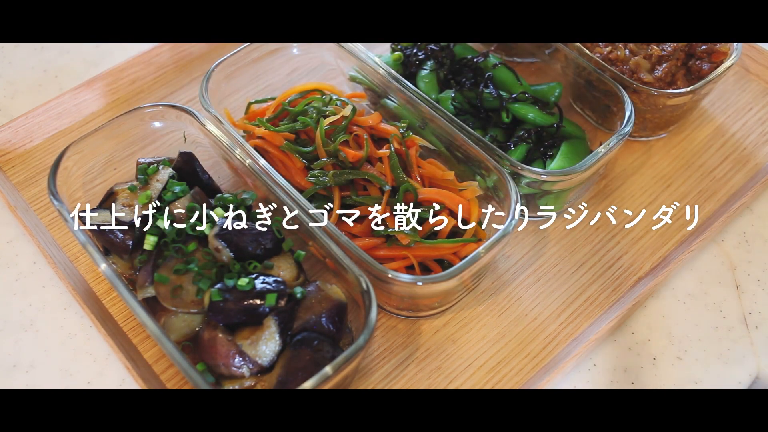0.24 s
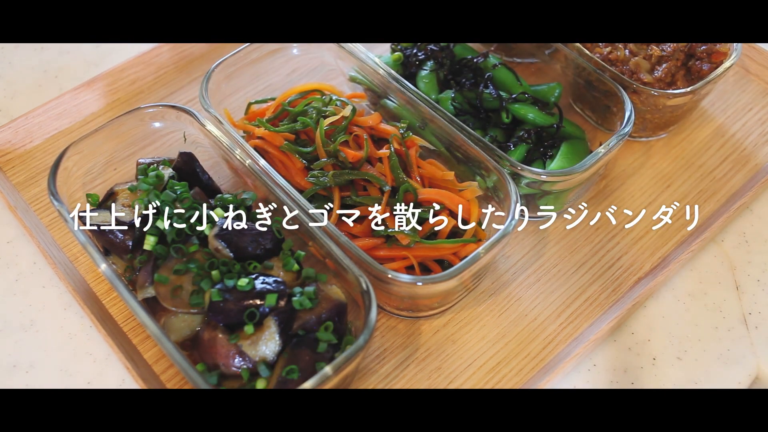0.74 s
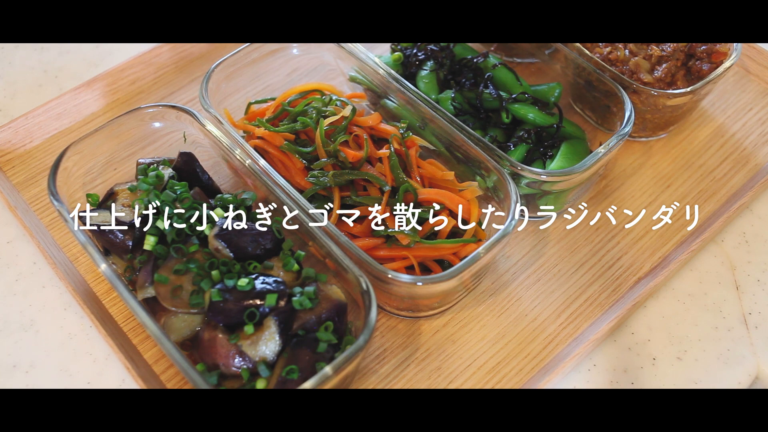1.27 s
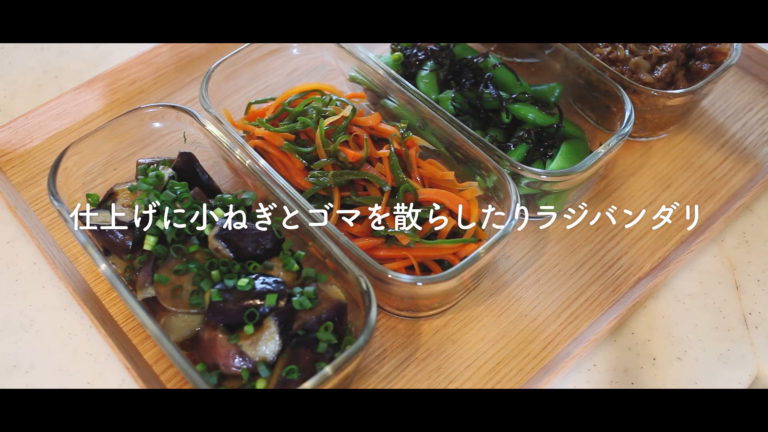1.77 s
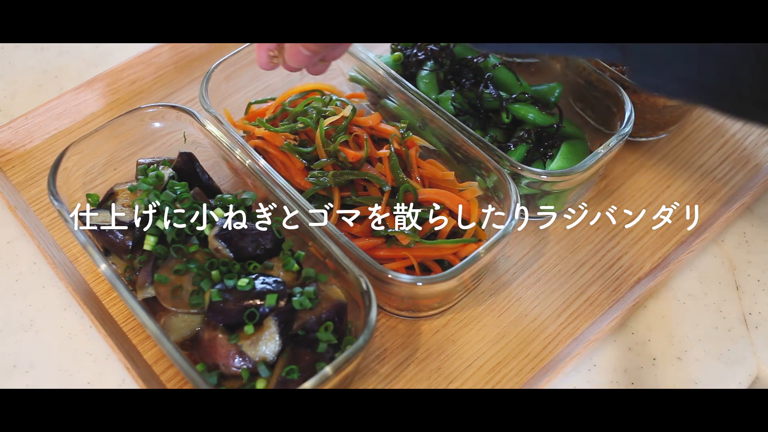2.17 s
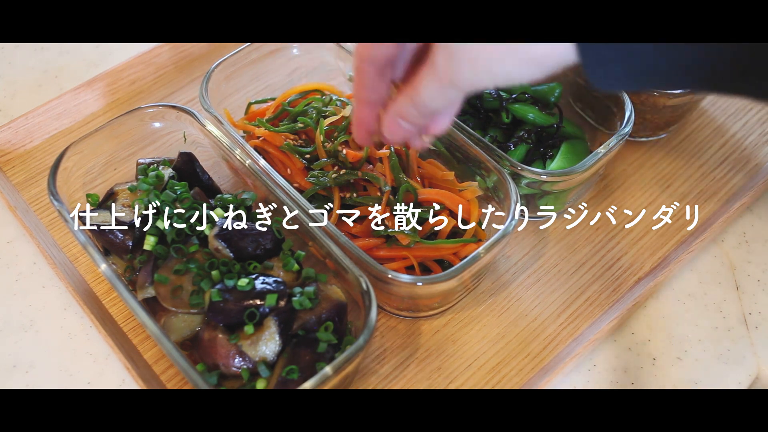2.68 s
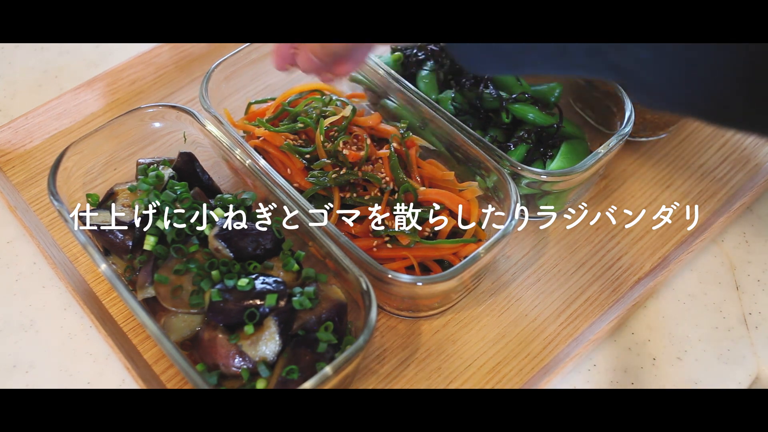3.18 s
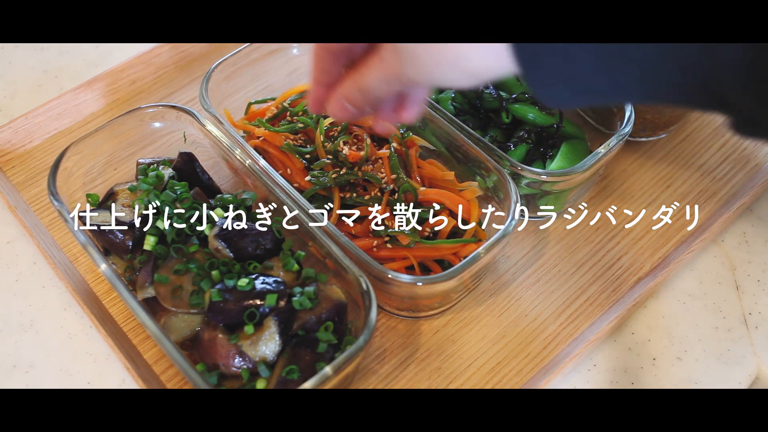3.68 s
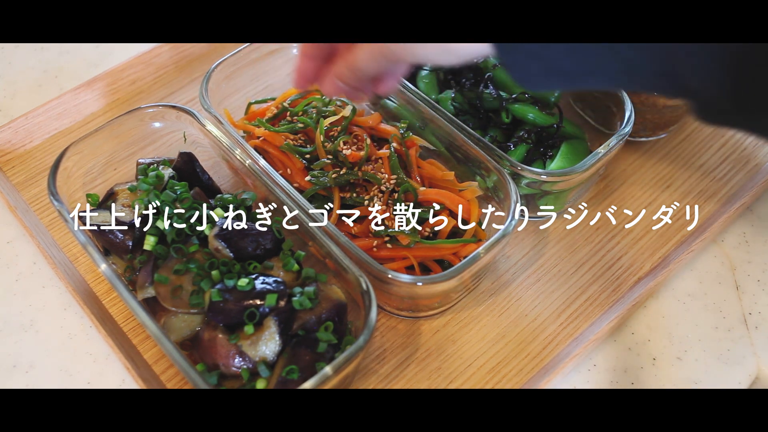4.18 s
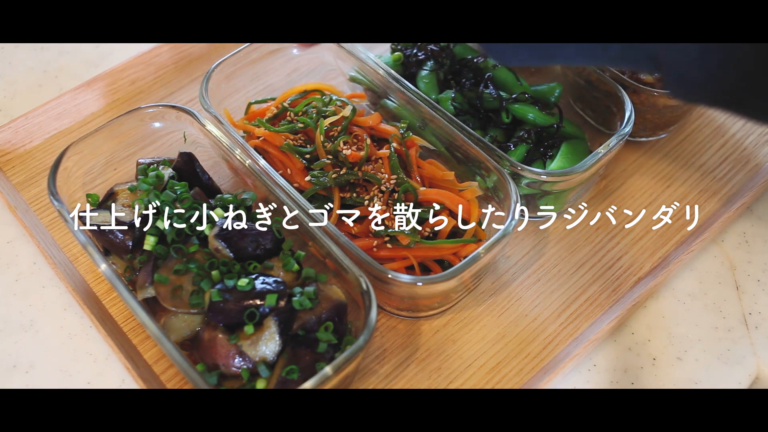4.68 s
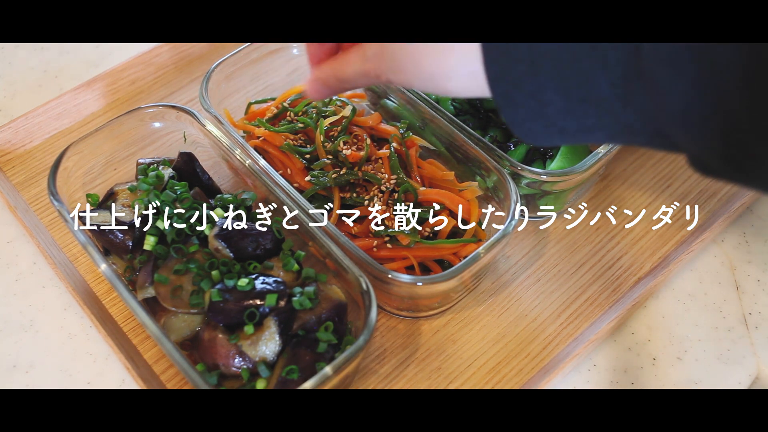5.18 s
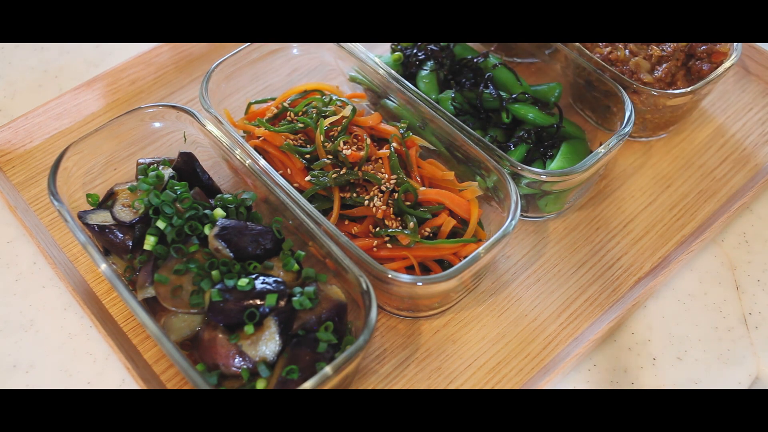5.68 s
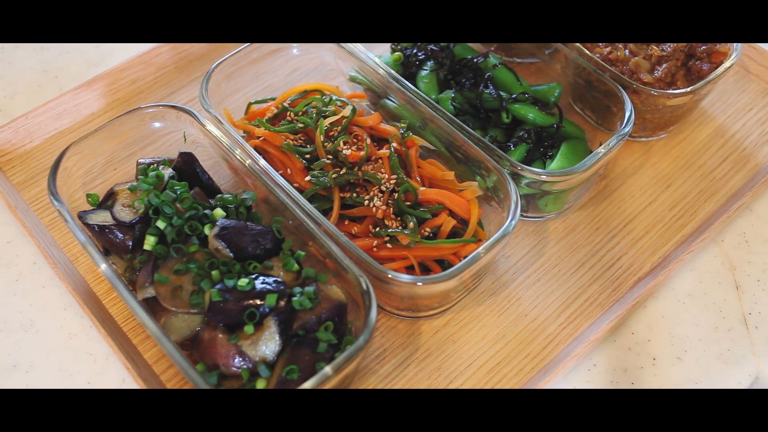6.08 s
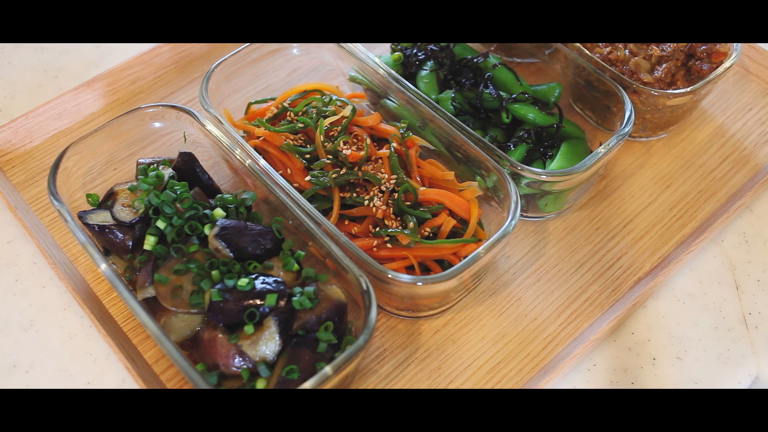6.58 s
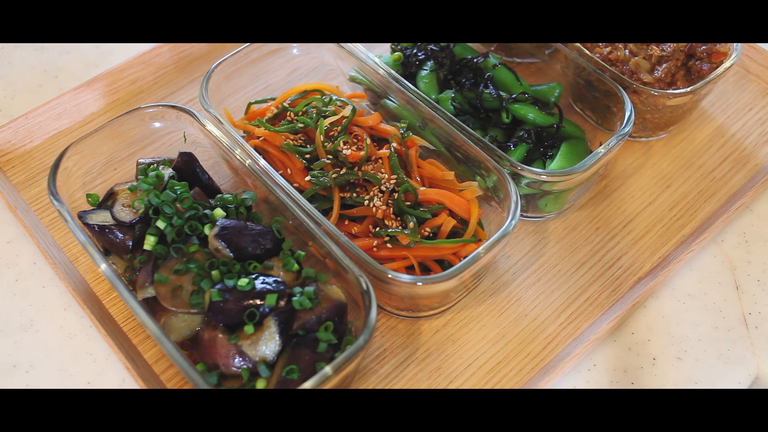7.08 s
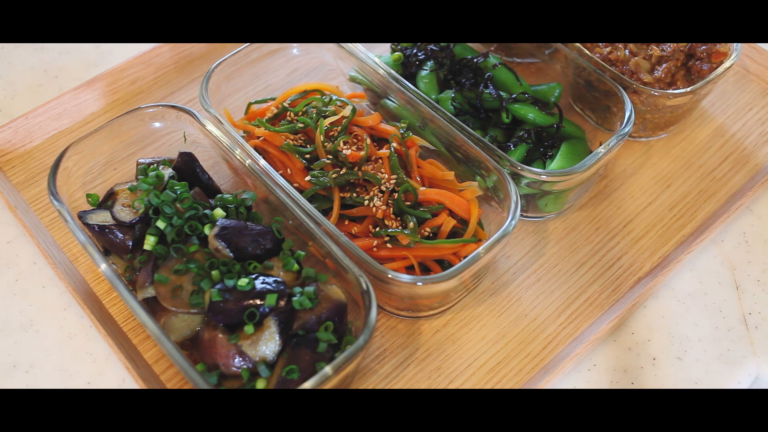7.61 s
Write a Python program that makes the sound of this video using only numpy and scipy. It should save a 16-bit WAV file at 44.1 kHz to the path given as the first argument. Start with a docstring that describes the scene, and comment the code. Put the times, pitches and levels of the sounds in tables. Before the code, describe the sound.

A quiet home kitchen, heard close up, with low soft ventilation and a short hard-walled tail. From 0.1 to 0.7 s a plastic pouch crinkles lightly, with a firmer click near 0.4 and a crisp pair at 0.8. Near-quiet follows until 1.6-1.7, when film slides and fingers bump a hollow tub; another bump and click at 2.0 brings a tiny rim squeak. From about 2.1 to 5.2 fingertips rub sesame in a very faint grainy hiss, with bright seed ticks on glass around 2.2-2.8, 3.7 and 4.9, and soft patter on food near 3.7. At 5.5-5.7 the tub is bumped again, then knocks and rocks on the wooden counter at 5.8. Loud, sharp crumpling bursts from 6.05 to 6.55, eases, and flares again at 6.9-7.2, leaving a faint dish-like ring. Small creases and a weak knock near 7.4 fade into room tone.

```python
"""A plastic pouch crinkles open and is later crumpled shut: filtered click grains make its buckles, creases and folds.
In between, fingers bump a hollow tub (damped modes), squeak on its rim and rub pinches of sesame (grainy hiss).
A few seeds ping on glass, others patter on food, and the tub knocks on a wooden counter (modes plus noise).
The hardest buckles leave a faint dish-like ring. Close kitchen walls add a short tail, over soft ventilation."""
import sys
import numpy as np
from scipy import signal
from scipy.fft import rfft, irfft
from scipy.io import wavfile

SR = 44100
rng = np.random.default_rng(int(sys.argv[2]) if len(sys.argv) > 2 else 0)


def materialize(psi):
    """Save the field psi as 16-bit PCM at rate SR to the path in sys.argv[1].

    A 1-D psi becomes a single channel; in a 2-D psi each row is a channel.
    """
    bounded = np.clip(np.atleast_2d(psi).T, -1, 1)
    quanta = np.round(bounded * 32767).astype(np.int16)
    wavfile.write(sys.argv[1], SR, quanta)


N = 346185
T = np.arange(N) / SR  # time axis of the scene, s
HIT_T = np.arange(8192) / SR  # time axis of one hit, s

# Buckles of the pouch; small facets tilt bright, large ones dull:
# [t/s, peak level before trim/dB, tilt/(dB per octave), decay time of the crunch/s]
BUCKLES = [(0.1388,-38.5,-2.5,0.032),(0.2258,-33,1.5,0.034),(0.29,-36,4,0.027),(0.344,-35.5,7,0.034),(0.42,-20,0.5,0.027),(0.4818,-40,15,0.035),(0.589,-33,8.5,.025),(0.6396,-31.5,-2.5,0.027),
           (0.7786,-31,-1,.022),(0.7883,-22.5,1.5,0.017),(0.7908,-19,2,0.015),(0.9998,-42,2,0.016),(1.595,-34,1.5,0.023),(1.63,-34,5,0.018),(2.0092,-25.5,-0.5,0.018),(5.592,-36,-6.5,0.027),(5.6078,-30,-4,0.076),
           (6.061,-16,-2,0.018),(6.1981,-13,-1.5,0.052),(6.2313,-14.5,-3,0.022),(6.2712,-7,0,0.026),(6.2947,-12,0,0.049),(6.326,-16.5,-1.5,0.03),(6.3985,-15.5,0,.04),(6.412,-16.5,5,0.01),(6.426,-11.5,3.5,0.023),(6.469,-18,-0.5,0.02),
           (6.878,-20,2,0.052),(6.910,-17.5,-4,0.024),(6.9143,-8.5,0.5,0.025),(6.925,-9.5,3,0.015),(6.929,-9,1,0.0059),(6.945,-19,0,.02),(6.9775,-16.5,1.5,0.079),
           (7.0037,-13,9,0.011),(7.0067,-9.5,9,0.017),(7.0211,-14,3.5,.025),(7.165,-21,2,0.034),(7.256,-37.5,-3.5,0.033),(7.3808,-24.5,-1,0.028)]
# Tone of the creasing film: [f/Hz, relative level/dB]
FILM_TONE = [(70,-45),(170,-26.5),(350,-6.5),(750,-3),(1400,-1.5),(3000,0.5),(6800,2.5),(9200,-7),(12000,-27),(15500,-49.5)]


def undb(db):
    """Decibels to gain."""
    return 10 ** (np.asarray(db) / 20)


def unit(x):
    """Scale to rms 1."""
    return x / np.sqrt(np.mean(x ** 2))


def strike(x):
    """Scale a hit to rms 1 over its first 3 ms."""
    return x / np.sqrt(np.mean(x[:132] ** 2))


def curve(rows):
    """Draw each column of a table of (time, ...) rows as a line, sample by sample."""
    s, *columns = np.transpose(rows)
    return [np.interp(T, s, column) for column in columns]


def swell(t, rise, fall):
    """Bell-shaped envelope with its crest at t = 0 and separate rise and fall times in s."""
    return np.exp(-(t / np.where(t < 0, rise, fall)) ** 2)


def add(out, s, x):
    """Mix x into out at time s."""
    i = int(s * SR)
    out[i:i + len(x)] += x[:len(out) - i]


def band(x, lo_hz, hi_hz, order=2):
    """Band-pass."""
    sos = signal.butter(order, [lo_hz, hi_hz], "band", fs=SR, output="sos")
    return signal.sosfilt(sos, x)


def colour(x, points, ripple_db=0, size=4096):
    """Minimum-phase filter through (Hz, dB) points, with chance resonances on top."""
    hz, db = np.transpose(points)
    f = np.maximum(np.arange(size // 2 + 1) * SR / size, 1)
    ripple_f = np.linspace(np.log(200), np.log(SR / 2), 40)
    ripple = np.interp(np.log(f), ripple_f, rng.standard_normal(40))
    response_db = np.interp(np.log(f), np.log(hz), db) + ripple_db * ripple
    # folding the cepstrum forward makes the filter causal
    cepstrum = irfft(np.log(undb(response_db)))
    cepstrum[1:size // 2] *= 2
    cepstrum[size // 2 + 1:] = 0
    impulse = irfft(np.exp(rfft(cepstrum)))
    return signal.fftconvolve(x, impulse)[:len(x)]


def grains(count, per_s, spread_db):
    """Clicks at random moments with random signs; spread_db scales how far their sizes scatter."""
    sizes = undb(spread_db * np.minimum(rng.exponential(size=count), 4))
    clicks = rng.random(count) < per_s / SR
    return unit(clicks * rng.choice([-1, 1], count) * sizes)


def crinkle(count, per_s, spread_db, points, ripple_db):
    """Creases spread over four facets of film, each with its own resonances."""
    facets = [colour(grains(count, per_s / 4, spread_db), points, ripple_db) for _ in range(4)]
    return unit(sum(facets))


def fade(t60):
    """Exponential decay of a hit, falling 60 dB in t60 seconds."""
    return np.exp(-np.log(1000) * HIT_T / t60)


def ring(modes, weight_db, scatter_db=1):
    """Damped modes; the place and hardness of the blow weight their shares."""
    hz, db, t60 = np.transpose(modes)
    gain = undb(db + weight_db(hz) + scatter_db * rng.standard_normal(len(hz)))
    gain = gain * rng.choice([-1, 1], len(hz))
    sines = np.sin(2 * np.pi * hz[:, None] * HIT_T)
    return strike(gain @ (fade(t60[:, None]) * sines))


def crack(lo_hz, hi_hz, t60):
    """The brief noise of a contact."""
    return strike(band(rng.standard_normal(len(HIT_T)) * fade(t60), lo_hz, hi_hz, order=3))


def kitchen(x, wet_db=0):
    """Dense reflections from counter and walls, drawn afresh for every sound; the bass decays slowest."""
    response = np.zeros(len(HIT_T))
    build_up = 1 - np.exp(-HIT_T / 0.00026)
    # low edge Hz, high edge Hz, t60 s, level dB
    for lo, hi, t60, db in [(100, 730, 0.26, -3.5), (750, 2420, 0.21, 1.0),
                            (3050, 9100, 0.22, -3), (6900, SR / 2 - 1, 0.2, -3.0)]:
        tail = rng.standard_normal(len(HIT_T)) * fade(t60) * build_up
        response += undb(db + wet_db) * band(tail / np.linalg.norm(tail), lo, hi)
    response[0] += 1  # the direct sound
    return signal.fftconvolve(x, response)


def room_tone():
    """Soft ventilation rumble and hiss: coloured noise whose level drifts."""
    # Tone of the ventilation: [f/Hz, relative level/dB]
    ventilation = [(15, -31.5), (30, 2.5), (55, -2), (183, -10), (233, -5), (281, -13.5), (368, -7.5),
                   (457, -14.5), (703, -10.5), (826, -17), (1710, -20), (3340, -19.5), (3830, -18.5),
                   (5730, -20.5), (15500, -36)]
    # Drift of the room tone: [t/s, level/dB]
    drift = [(0,-62.5),(.9,-70),(1.35,-69),(1.8,-64.5),(7,-65.5),(7.8,-71.5)]
    db, = curve(drift)
    return unit(colour(rng.standard_normal(N), ventilation)) * undb(db)


def rustle():
    """Worked film: thousands of tiny creases a second, a bass as the pouch flexes, a sharp edge when pressed hard."""
    # Spells of working the pouch, one to open it and two to close it; rows in each:
    # [t/s, level of the creases before trim/dB, level of the bass before trim/dB]
    spells = [
        [(0.12, -73, -85), (0.192, -46.5, -78), (0.316, -50.5, -69), (0.442, -50.5, -80), (0.686, -62, -82),
         (0.76, -82, -86)],
        [(5.98, -62, -72), (6.114, -45.5, -61), (6.242, -34.5, -51), (6.306, -76, -60), (6.368, -44, -40),
         (6.416, -32, -38), (6.506, -35, -49.5), (6.658, -42, -53), (6.82, -46.5, -61.5)],
        [(6.82, -46, -51.5), (7.054, -44, -44), (7.192, -73, -90), (7.3, -65, -46.5)],
    ]
    creases_trim_db, bass_trim_db = -3, -4.5
    pressed_db, edge_db = -34, -12  # at a crease level of pressed_db the edge lies edge_db from it
    catch_s, catch_db = 0.012, 3.5  # the film catches and gives: step time, spread of the level
    out = np.zeros(N)
    for spell in spells:
        s, creases_db, bass_db = np.transpose(spell)
        t = np.arange(s[0], s[-1], 1 / SR)
        db = np.interp(t, s, creases_db)
        creases = crinkle(len(t), per_s=3400, spread_db=3.5, points=FILM_TONE, ripple_db=2.0)

        middle = undb(db + creases_trim_db) * unit(band(creases, 1100, 15000, order=3))
        bass_gain = undb(np.interp(t, s, bass_db) + bass_trim_db)
        bass = bass_gain * unit(band(creases, 130, 636, order=3))
        edge_gain = undb(db + edge_db + 0.5 * (db - pressed_db))  # grows faster than the creases
        edge = edge_gain * unit(band(creases, 9250, 16000, order=3))

        catches = np.arange(0, N / SR, catch_s)
        fits = undb(catch_db * np.interp(t, catches, rng.standard_normal(len(catches))))
        ends = signal.windows.tukey(len(t), 0.05)
        add(out, s[0], kitchen((middle + bass + edge) * fits * ends))
    return out


def buckles():
    """A crease buckles with a click and a dying shower of creases; force adds bass and top."""
    # Tone of a firm buckle: [f/Hz, relative level/dB]
    firm_tone = [(70,-44),(170,-26),(350,-5),(750,-6),(1200,-3),(2400,-0.5),(3600,-1),(6800,-1.5),(9500,-13.5),(15000,-39.5)]
    firm_db = -9.5  # peak of a firm buckle, before trim
    body_per_db, edge_per_db = 0.24, 0.83  # dB of bass and of top gained per dB of force
    out = np.zeros(N)
    hz, tone_db = np.transpose(firm_tone)
    more_bass = np.interp(hz, [750, 1200], [body_per_db, 0])
    more_top = np.interp(hz, [6800, 9500], [0, edge_per_db])
    for s, db, tilt_db, length in BUCKLES:
        decay = fade(length) + undb(-6.5) * fade(3 * length)
        burst = grains(len(HIT_T), per_s=7000, spread_db=2.0) * decay
        burst[0] += 2.2  # the first click
        shape = tone_db + tilt_db * np.log2(hz / 1000) + (db - firm_db) * (more_bass + more_top)
        click = colour(burst, np.column_stack([hz, shape]))
        add(out, s, kitchen(undb(db - 9.0) * strike(click)))
    return out


def slides():
    """Film slides once: the creases swell and die away, sharper when pressed hard."""
    # Single slides of plastic: [t of the crest/s, level/dB, rise plus fall time/s, body/dB]
    strokes = [(0.398,-43.5,0.059,-2.5),(0.603,-51.5,0.027,-2),(0.658,-49.5,.045,-12),(0.957,-63,0.036,4),(1.136,-66.5,0.049,0),(1.614,-41.5,0.043,-3),(1.655,-37,.042,-1),(2.016,-49,0.08,-8),(5.547,-62,0.061,12),(5.647,-47,0.1,6.5),(6.423,-30.5,0.047,5),(6.611,-34,0.054,-11),(7.05,-31,0.039,-10),(7.143,-39.5,0.042,3),(7.449,-55.5,0.075,14.5),(7.55,-59,0.14,-3.5)]
    rise_share = 0.42  # part of the length before the crest
    out = np.zeros(N)
    hz, film_db = np.transpose(FILM_TONE)
    low = np.interp(hz, [700, 2500], [1, 0])
    high = np.interp(hz, [7000, 12000], [0, 1])
    for s, db, length, body_db in strokes:
        rise, fall = length * rise_share, length * (1 - rise_share)
        t = np.arange(-3 * rise, 3 * fall, 1 / SR)
        tone_db = film_db + body_db * low + 0.66 * (db + 34.0) * high
        shape = np.column_stack([hz, tone_db])
        creases = crinkle(len(t), per_s=5500, spread_db=2, points=shape, ripple_db=3.5)
        add(out, s + t[0], kitchen(undb(db) * creases * swell(t, rise, fall)))
    return out


def fingers():
    """Fingertips keep rolling the pinch: a fine, grainy hiss from ten bands, weighted around a moving centre."""
    # Course of the rubbing: [t/s, level/dB, centre f/Hz]
    rubbing = [(1.2,-80,5200),(1.55,-67.5,4900),(2.6,-76.5,6760),(3.3,-72,6830),(4.1,-76,5130),(4.8,-73.5,4500),(5.1,-92,5430)]
    db, centre_hz = curve(rubbing)
    out = np.zeros(N)
    for hz in np.geomspace(2000, 13000, 10):
        octaves_off = np.log2(hz / centre_hz)
        share = 1 / (1 + (octaves_off / 0.18) ** 2)
        out += share * band(grains(N, per_s=3300, spread_db=4.5), hz / 1.19, hz * 1.16)
    return unit(out) * undb(db)


def tub_bumps():
    """Fingers bump the hollow tub: a few damped modes, softened by the slow push of a fingertip."""
    # Bumps: [t/s, level/dB, lowest mode f/Hz]
    bumps = [(1.63,-47,320),(1.663,-37,325),(1.675,-36.5,340),(1.784,-55,275),(2.011,-34,330),(5.491,-55.5,346),(5.609,-50,305),(5.638,-45,327),(5.674,-43,330),(7.04,-40.5,428),(7.166,-45.5,383),(7.255,-45,407)]
    # Modes of the tub: [ratio to the lowest mode, relative level/dB, t60/s]
    tub_modes = np.array([(1.001,5,0.071),(1.6,1.5,0.072),(3,2,0.019),(4.65,-0.5,0.03)])
    fingertip_s = 0.0019  # time constant of the push on the wall
    out = np.zeros(N)
    push = 1 - np.exp(-HIT_T / fingertip_s)
    for s, db, hz in bumps:
        bump = push * ring(tub_modes * [hz, 1, 1], np.zeros_like, scatter_db=0.0)
        add(out, s, kitchen(undb(db) * band(bump, 260, 4000, order=3), wet_db=-3))
    return out


def squeak():
    """A fingertip slips on the rim of the tub: a short burst of noise in a band around one pitch."""
    # The slip: (t/s, level before the last band-pass/dB, f/Hz)
    slip = (2.0485,-36,2230)
    out = np.zeros(N)
    s, db, hz = slip
    burst = crack(hz / 1.8, hz * 1.5, t60=0.058)
    add(out, s, kitchen(undb(db) * band(burst, hz / 1.35, hz * 1.5), wet_db=-13.0))
    return out


def flicks():
    """Brisk rubs of the fingertips that shed the seeds: short swells of grainy hiss."""
    # Rubs: [t of the crest/s, level/dB, centre f/Hz]
    rubs = [(2.121,-60,6200),(4.85,-65,6100),(5.215,-63,7160)]
    half_s, width = 0.049, 1.33  # half length; ratio of band edge to centre
    out = np.zeros(N)
    for s, db, hz in rubs:
        hiss = unit(band(grains(N, per_s=3800, spread_db=-3), hz / width, hz * width))
        out += undb(db) * hiss * swell(T - s, half_s, half_s)
    return out


def glass_pings():
    """Stray seeds tick on the glass and make it ring, loudest in the modes near the pitch the contact favours."""
    # Strays: [t/s, level before the mix of ring and tick/dB, favoured f/Hz]
    strays = [(2.227,-56,8850),(2.338,-49,9800),(2.582,-58.5,10000),(2.822,-50,5930),(3.668,-63,8500),(3.793,-59,10000),(4.931,-53,4870),(4.979,-54,4900)]
    # Modes of the glass: [f/Hz, relative level/dB, t60/s]
    glass_modes = [(2580,-9,0.05),(3830,-2.5,0.052),(5990,2.5,0.038),(8270,-2.5,0.036),(10970,-10,0.046),(13450,-16,.035)]
    out = np.zeros(N)
    for s, db, contact_hz in strays:
        ping = ring(glass_modes, lambda hz: -9 * np.abs(np.log2(hz / contact_hz)))
        tick = crack(3370, 8800, t60=0.034)
        add(out, s, kitchen(undb(db) * (undb(-2) * ping + undb(-2.5) * tick), wet_db=-1.5))
    return out


def patter():
    """Sesame lands faintly on the food: a swell of bright random clicks."""
    # The fall: (t at the thickest/s, half length/s, level of the steady clicks/dB)
    sprinkle = (3.68,0.37,-77)
    s, half_s, db = sprinkle
    clicks = unit(band(grains(N, per_s=400, spread_db=8.0), 5000, 15000))
    return undb(db) * clicks * swell(T - s, half_s, half_s)


def counter_knocks():
    """The tub lands and rocks on the wooden counter: damped modes of the wood plus contact noise."""
    # Knocks: [t/s, level before trim/dB, dulling/(dB per octave)]
    knocks = [(5.7655,-23,-1.5),(5.824,-28,1.5),(5.860,-27.5,1.5),(6.399,-25.5,4),(7.422,-46.5,2.5)]
    # Modes of the counter: [f/Hz, relative level/dB, t60/s]
    counter_modes = [(230,-10.5,0.038),(400,3,0.017),(815,1.5,0.012),(1780,8.5,0.013),(3130,3,0.0092),(4010,8.5,0.011),(4450,4,0.012)]
    out = np.zeros(N)
    for s, db, dull_db in knocks:
        wood = ring(counter_modes, lambda hz: -dull_db * np.log2(hz))
        contact = undb(-3.0 - dull_db) * crack(170, 7800, t60=0.047)
        # the contact lasts long enough to round off the top
        knock = band(wood + contact, 154, 5900, order=3)
        add(out, s, kitchen(undb(db - 4.0) * knock, wet_db=-0.5))
    return out


def folds():
    """A panel of film gives way gradually: a brief swell of small creases rings one broad resonance."""
    # Soft folds: [t of the crest/s, level before trim/dB, resonance f/Hz]
    panels = [(6.17,-40,2280),(6.237,-29,1260),(6.371,-32.5,2990),(6.528,-36.5,3600),(6.663,-40,1480),(6.725,-35.5,2020),(6.847,-34.5,2240),(6.917,-28.5,3000),(7.007,-27,6990),(7.171,-34.5,4410),(7.486,-42,1900)]
    out = np.zeros(N)
    t = HIT_T - 0.02
    for s, db, hz in panels:
        creases = crinkle(len(t), per_s=12000, spread_db=3.0, points=FILM_TONE, ripple_db=2)
        panel = unit(band(creases, hz / 2.26, hz * 1.54)) + undb(-6) * unit(creases)
        add(out, s + t[0], kitchen(undb(db - 2) * panel * swell(t, 0.005, 0.009)))
    return out


def dish():
    """The hardest buckles leave a faint ring of damped modes, as from a dish standing close by."""
    # Modes of the dish: [f/Hz, relative level/dB, t60/s]
    dish_modes = [(895,-4.5,.5),(1306,0,0.33),(1590,-6.5,0.97),(1740,-1,0.59),(1920,-3,.55),(2000,0,0.63),(2611,-3,0.8),(3200,-4.5,0.71),(3295,-4,.5)]
    from_db, below_db = -10, -33  # buckles peaking above from_db ring it; ring level relative to that peak
    out = np.zeros(N)
    hz, db, t60 = np.transpose(dish_modes)
    t = np.arange(SR) / SR
    decay = np.exp(-np.log(1000) * t / t60[:, None])
    for s, peak_db, *_ in BUCKLES:
        if peak_db > from_db:
            phase = 2 * np.pi * rng.random((len(hz), 1))
            modes = decay * np.sin(2 * np.pi * hz[:, None] * t + phase)
            add(out, s, undb(peak_db + below_db) * (undb(db) @ modes))
    return out


def scene():
    """All the handling in the kitchen, over its room tone."""
    pouch = rustle() + buckles() + slides() + folds()
    tub = tub_bumps() + squeak() + counter_knocks()
    sesame = fingers() + flicks() + glass_pings() + patter()
    return (room_tone() + pouch + tub + sesame + dish())[None]


def record(dry):
    """A steep low-pass cuts the top above 15.75 kHz."""
    sos = signal.ellip(10, 0.2, 70, 15750, fs=SR, output="sos")
    return signal.sosfilt(sos, dry)


dry = scene()
out = record(dry)
materialize(out)
```